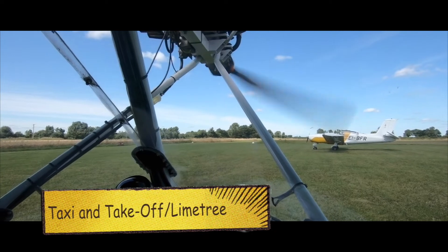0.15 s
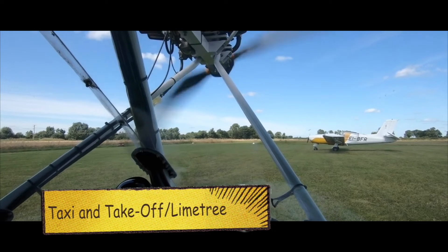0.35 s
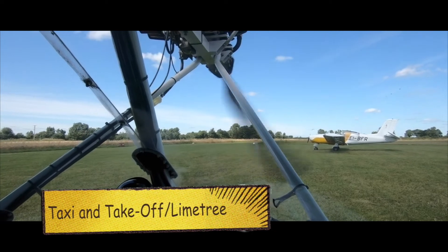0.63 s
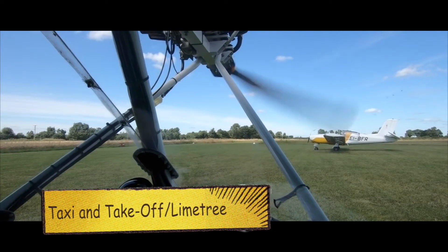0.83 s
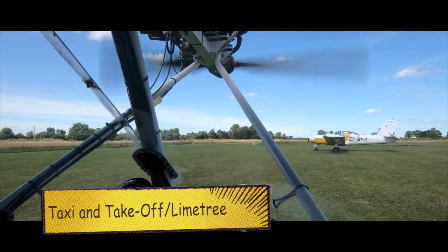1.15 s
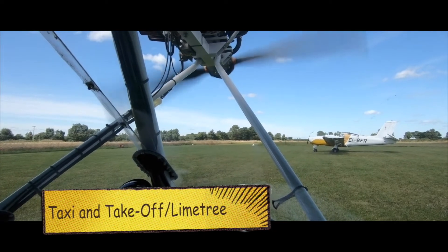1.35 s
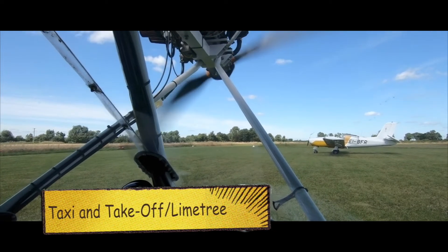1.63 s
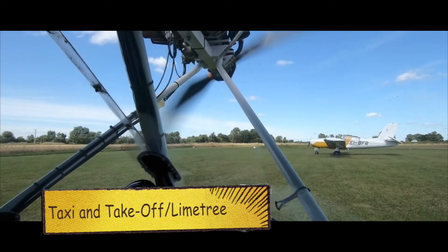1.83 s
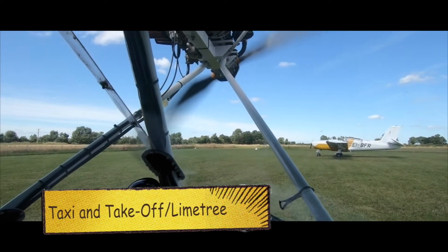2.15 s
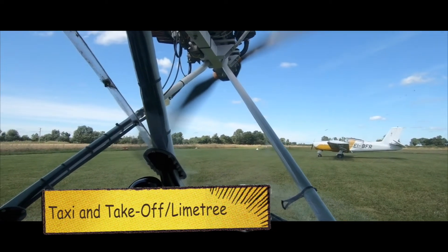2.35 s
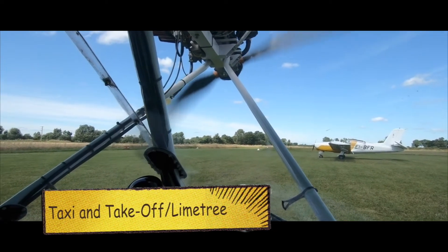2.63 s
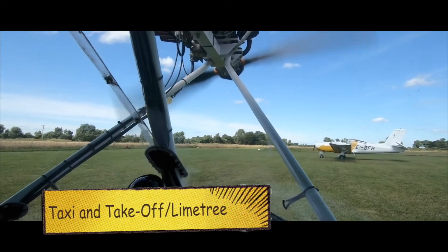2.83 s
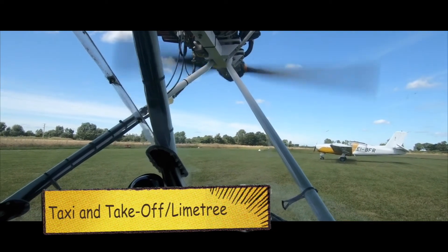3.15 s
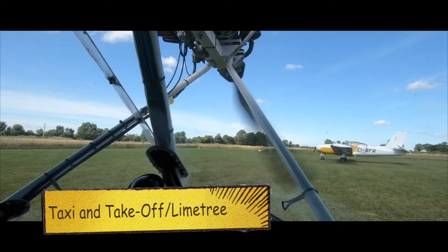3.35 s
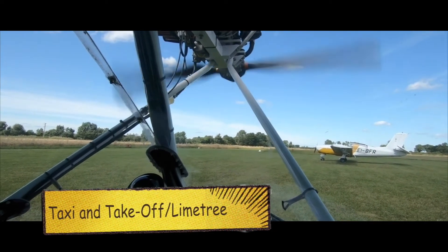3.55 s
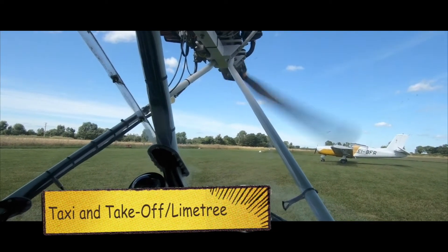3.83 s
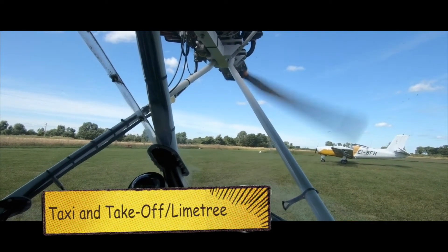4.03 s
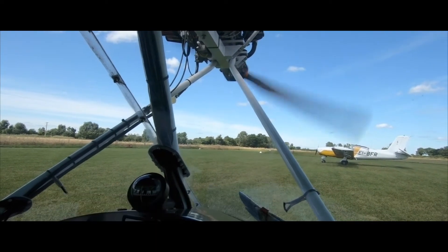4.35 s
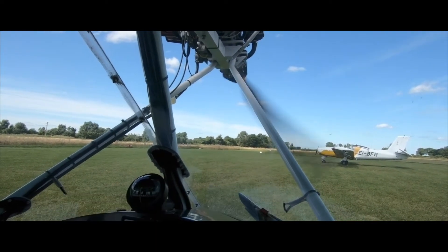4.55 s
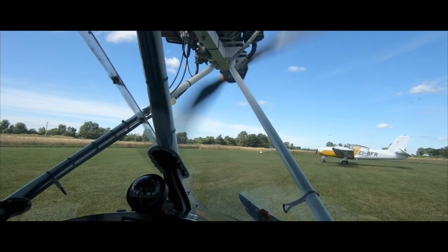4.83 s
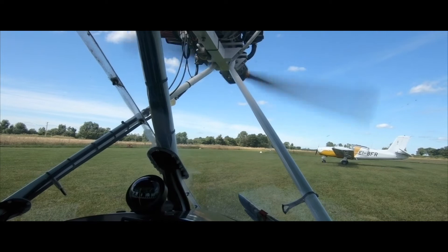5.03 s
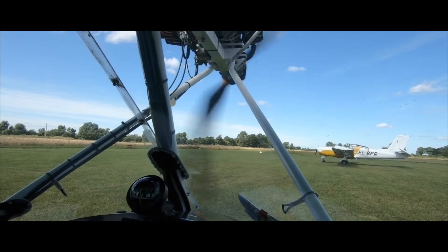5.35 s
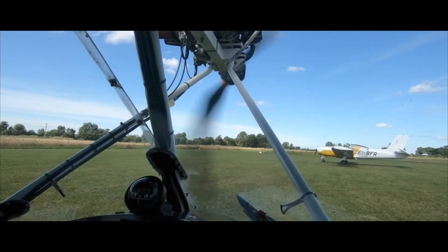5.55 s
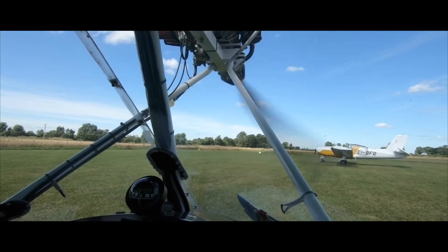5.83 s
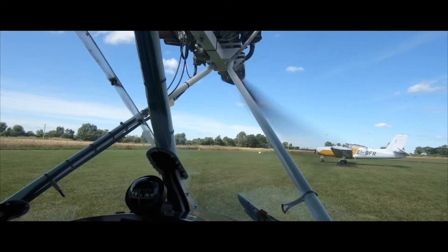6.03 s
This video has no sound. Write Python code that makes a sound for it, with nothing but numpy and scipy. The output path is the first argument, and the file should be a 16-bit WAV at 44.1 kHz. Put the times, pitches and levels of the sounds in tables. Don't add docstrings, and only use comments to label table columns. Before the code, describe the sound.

Close, rough two-cylinder engine drone with metallic rattle sags to a loud, harsh labour around four seconds, then climbs to a smoother buzzing hum.

```python
import sys
import numpy as np
from scipy import signal
from scipy.fft import rfft, irfft, next_fast_len
from scipy.io import wavfile
from scipy.ndimage import map_coordinates

SR = 44100
rng = np.random.default_rng(int(sys.argv[2]) if len(sys.argv) > 2 else 0)


def makeup_ratio(level_db):
    decades = np.asarray(level_db, float) / 20
    return 10 ** decades


def to_wav(s):
    ch = np.atleast_2d(s).T
    pcm = np.round(np.clip(ch, -1, 1) * 32767)
    wavfile.write(sys.argv[1], SR, pcm.astype(np.int16))


N = 273420


def unit(x):
    return x / np.sqrt(np.mean(x ** 2) + 1e-20)


def noise():
    return rng.standard_normal(N)


def along(points, hz):
    point_hz, point_db = np.transpose(points)
    return makeup_ratio(np.interp(np.log(hz + 1), np.log(point_hz + 1), point_db))


def bells(x, rows):
    return sum(height * np.exp(-((x - center) / width) ** 2) for center, width, height in rows)


def curves(rows):
    seconds, *columns = np.transpose(rows)
    return [np.interp(np.arange(N) / SR, seconds, column) for column in columns]


def wobble(rate):
    knots = rng.standard_normal(int(N * rate / SR) + 4)
    return map_coordinates(knots, [np.arange(N) * rate / SR])


def filtered(x, gain):
    m = 2 * next_fast_len(N // 2 + 8192)
    cepstrum = irfft(np.log(gain(np.fft.rfftfreq(m, 1 / SR)) + 1e-6), m)
    cepstrum[1:m // 2] *= 2
    cepstrum[m // 2 + 1:] = 0
    return unit(irfft(rfft(x, m) * np.exp(rfft(cepstrum)), m)[:N])


def firings(cycles):
    return np.flatnonzero(np.diff(np.floor(cycles)))


def per_firing(cycles, spread_db):
    return makeup_ratio(spread_db * rng.standard_normal(int(cycles[-1]) + 2))[cycles.astype(int)]


def puff(cycles, sharp):
    return np.exp(sharp * np.cos(2 * np.pi * (cycles - 0.1)))


STEPS = (0, .5, 1)


def by(setting, values):
    return np.interp(setting, STEPS, values)


MULTIPLES = (1, 2, 3, 4, 5, .5, 1.5, 3.5, 7, 8)
ORDER_STEPS = (0, .3, .55, 1)
ORDER_DB = [(-18.5, -17, -17, -19), (-39, -26, -18, -15), (-43, -27.5, -30, -31.5), (-56, -44, -31, -26.5),
            (-56, -54.5, -38.5, -33), (-29, -30, -36, -46), (-23.5, -37, -46, -44.5),
            (-54, -41, -46, -30.5), (-58, -58, -56, -45), (-56, -57, -55.5, -40.5)]
# center in Hz, width in Hz, lift in dB.
CHAMBERS = [(67.5, 1.6, -2), (120.4, 6, -5.5), (182, 4.2, 6.5), (204.2, 6.4, 13.5), (221.4, 12, 12),
            (265.3, 16, 8.5), (302.5, 10, 3.5), (323, 6.5, 16.5), (467, 30, 14)]
CHAMBER_SHARE = (.05, .3, 0.85)


def order_levels(rate, load):
    share = by(load, CHAMBER_SHARE)
    levels = []
    for multiple, row in zip(MULTIPLES, ORDER_DB):
        levels.append(np.interp(load, ORDER_STEPS, row) + share * bells(multiple * rate, CHAMBERS))
    return levels


def firing_orders(cycles, rate, levels):
    pipe_hz, pipe_width_hz = 144, 15
    tones = np.zeros(N)
    for multiple, db in zip(MULTIPLES, levels):
        hz = multiple * rate
        turn = sum(2 * np.arctan(2 * (hz - wave * pipe_hz) / pipe_width_hz) for wave in (1, 2))
        unsteady = 0.088 * multiple * wobble(8.3)
        level = np.sqrt(2) * makeup_ratio(db + 0.4 * multiple * wobble(14))
        tones += level * np.cos(2 * np.pi * multiple * cycles - turn + unsteady)
    return tones


# frequency in Hz, level in dB per Hz.
LOADED = [(8, -36.5), (25, -21), (50, -1.5), (100, 7.5), (130, 13), (200, 9.5), (300, 7.5), (380, -3.5),
          (600, -13.5), (1200, -60), (4000, -120)]
# frequency in Hz, level in dB per Hz.
LIGHT = [(8, -31), (25, -28), (45, -10), (63, 17.5), (80, 5), (125, 5), (170, 3.5), (290, -2.5), (380, -36),
         (600, -16), (1200, -64), (4000, -120)]
LIGHT_SHARE = (1, 0.05, 0.3)


def uneven_burns(cycles, load, thump_db):
    light = np.clip(by(load, LIGHT_SHARE), 0, 1)
    fired = firings(cycles)
    excess = rng.uniform(-0.024, 1, len(fired) + 1)
    kicks = np.zeros(N)
    kicks[fired] = excess[1:] - 0.9 * excess[:-1]
    kicks = unit(kicks)
    turbulence = puff(cycles, 1.37) * noise()
    loaded = filtered(kicks + 0.52 * turbulence, lambda hz: along(LOADED, hz))
    favored = 1 - 0.49 * np.cos(np.pi * (cycles + 0.18))
    easy = filtered(favored * (kicks + 0.4 * turbulence), lambda hz: along(LIGHT, hz))
    return makeup_ratio(thump_db) * (np.sqrt(1 - light) * loaded + np.sqrt(light) * easy)


# multiple of the blade passing rate, level in dB.
BLADE_ORDERS = [(2, 3), (4, 1.5)]
BLADE_DB = (-31, -38, -45)
CHOP_DB = (3, 1.1, .5)


def propeller(cycles, load):
    firings_per_turn = 6
    blade_at = 5.34
    turns = (cycles - cycles[round(blade_at * SR)]) / firings_per_turn
    tones = np.zeros(N)
    for multiple, db in BLADE_ORDERS:
        phase = 4 * np.pi * multiple * turns + 1.3 * wobble(11)
        tones += makeup_ratio(db + 2.5 * wobble(7)) * np.cos(phase)
    chop = 0.63 * np.cos(4 * np.pi * turns) + 0.13 * np.cos(2 * np.pi * (turns - 0.1))
    return makeup_ratio(by(load, BLADE_DB)) * tones, makeup_ratio(by(load, CHOP_DB) * chop)


# frequency in Hz, level in dB per Hz.
METAL = [(530, -26.5), (900, -2), (1060, 1), (1500, -11), (1950, -10.5), (2120, -22), (2390, -15),
         (2590, -16.5), (3490, -18.5), (6720, -26), (7660, -32), (8430, -29), (11300, -51.5),
         (12900, -35.5), (15500, -55.5)]
# frequency in Hz, width in Hz, dB over the metal's color.
PANELS = [(1045, 83, -13), (1400, 21, -18), (1583, 25, -0.5), (1791, 65, -3.5), (1993, 25, 1.5),
          (2150, 74, -11.5), (2174, 110, 0.5), (2520, 29, -9), (2545, 33, -8.5), (2650, 36, -2.5),
          (2908, 75, -6.5), (3216, 30, -2.5), (4480, 74, -16.5), (5300, 26, -9.5), (5900, 87, -8),
          (6540, 140, -1.5), (7150, 210, -8), (8040, 71, -9)]


def panels(hz, lift_db):
    bumps = sum(makeup_ratio(db) / (1 + (2 * (hz - center) / width) ** 2) for center, width, db in PANELS)
    return along(METAL, hz) * (1 + makeup_ratio(lift_db) * bumps)


# frequency in Hz, level in dB per Hz.
GAS = [(180, -25.5), (300, -2.5), (410, -8), (640, -12), (900, -20), (1100, -23), (1300, -30), (1520, -30),
       (1750, -30.5), (2000, -35.5), (2250, -39), (2700, -50), (5000, -120)]
ROAR_DB = (-33, -27.5, -22.5)
CLATTER_DB = (-61.5, -45.5, -39.5)


def roar_and_clatter(cycles, chop, throttle):
    strength = per_firing(cycles, spread_db=1.38)
    gas = chop * strength * puff(cycles, 0.03) * noise()
    metal = strength * per_firing(cycles, spread_db=2.1) * puff(cycles, 0.21) * noise()
    roar = makeup_ratio(by(throttle, ROAR_DB)) * filtered(gas, lambda hz: along(GAS, hz))
    clatter = makeup_ratio(by(throttle, CLATTER_DB)) * filtered(metal, lambda hz: panels(hz, lift_db=10.5))
    return roar + clatter


# frequency in Hz, level in dB per Hz.
FINS = [(1000, -28.5), (2200, -7), (3000, -0.5), (4200, 3), (5500, 2.5), (6800, -1.5), (7600, -8.5),
        (8300, -9), (11300, -24.5), (13200, -10), (15600, -21)]
HISS_DB = (-63, -60, -48)
# frequency in Hz, level in dB per Hz.
WASH = [(3, -7), (10, -4), (25, -0.5), (45, -7.5), (120, -67)]


def slipstream(chop, throttle, rate):
    air = chop ** 0.3 * makeup_ratio(0.89 * wobble(13) + 0.81 * wobble(70)) * noise()
    wash = makeup_ratio(3.5 * wobble(6.6)) * noise()
    hiss_db = by(throttle, HISS_DB) + 1.04 * np.maximum(rate - 87.4, 0)
    hiss = makeup_ratio(hiss_db) * filtered(air, lambda hz: along(FINS, hz))
    return hiss + makeup_ratio(-47) * filtered(wash, lambda hz: along(WASH, hz))


# start in seconds, peak in dB, time to fall 60 dB in seconds.
HARD = [(0.4685, -35, 0.08), (0.7928, -43, 0.041), (.8957, -31, 0.055), (0.9552, -35, 0.099),
        (1.007, -34.5, 0.065), (1.1133, -28.5, 0.075), (1.1674, -32.5, 0.039), (1.243, -36, 0.057),
        (1.283, -34, 0.082), (1.348, -33, 0.078), (1.459, -38.5, .08), (1.51, -38, 0.09),
        (1.6154, -35.5, 0.058), (1.651, -30.5, 0.082), (1.7212, -33, 0.058), (1.8534, -27, .054),
        (1.914, -31, 0.091), (1.9872, -37, .07), (2.1182, -33, .07), (2.2775, -33.5, .058),
        (2.331, -31, .053), (2.384, -36.5, .07), (2.517, -36, .076), (2.5733, -36, 0.1),
        (2.665, -26.5, .04), (2.705, -35, .1), (2.921, -36, 0.049), (3.1132, -37.5, 0.081),
        (4.588, -37, .057), (4.855, -37, 0.047)]
FIRM_DB = (-61, -50, -39)


def hard_burns(cycles, throttle):
    firm_reach_db, firm_t60 = 11.5, 0.055
    fired = firings(cycles)[1:]
    firm_db = by(throttle[fired], FIRM_DB) + firm_reach_db * rng.uniform(size=len(fired)) ** 3
    firm = [(i / SR, db, firm_t60) for i, db in zip(fired, firm_db)]
    shake = np.zeros(N + SR)
    t = np.arange(SR // 5) / SR
    build = (1 - np.exp(-t / 0.003)) ** 2
    for s, db, t60 in [*HARD, *firm]:
        start = round((s - 0.002) * SR)
        shake[start:start + len(t)] += makeup_ratio(db + 2 - 60 * t / max(t60, 0.01)) * build
    drive = shake[:N] * noise()

    def body(hz):
        return panels(hz, lift_db=9.5) * makeup_ratio(bells(hz, [(2700, 1100, 3.5), (8300, 1500, 3.4)]))

    return np.sqrt(np.mean(drive ** 2)) * filtered(drive, body)


RASP_DB = (-79.5, -59, -37.5)
# center in Hz, width in Hz, lift in dB.
RASP_LIFT = [(1930, 150, 7.5), (2640, 250, 8), (3170, 200, 4), (8300, 900, 11.5)]


def rasp(cycles, throttle):
    drive = puff(cycles, 0.44) * noise()

    def hot_metal(hz):
        return panels(hz, lift_db=13) * makeup_ratio(bells(hz, RASP_LIFT))

    return makeup_ratio(by(throttle, RASP_DB)) * filtered(drive, hot_metal)


# time in seconds, firing rate in Hz.
SPEED = [(0, 80.49), (.45, 80.09), (1, 76.64), (1.6, 75.17), (2.4, 75.73), (2.65, 74.56), (3, 74.03),
         (3.15, 72.27), (3.3, 68.48), (3.7, 61.55), (3.85, 60.26), (4, 60.63), (4.25, 66.79), (4.6, 78.55),
         (4.9, 85.23), (5.35, 90.25), (6, 91), (6.2, 91.2)]
# time in seconds, propeller load from 0 to 1, throttle from 0 to 1, uneven thump in dB.
WORK = [(0, .2, 0.28, -24.5), (.3, 0.3, 0.25, -25.5), (.7, .36, 0.42, -22.5), (1.1, .5, 0.46, -22),
        (1.5, .48, .38, -22), (1.95, .55, 0.56, -23.5), (2.3, .55, 0.4, -24), (3.2, 0.5, 0.52, -25.5),
        (3.27, .9, 0.79, -29.5), (3.5, 0.8, 0.94, -26.5), (3.78, 1, 0.95, -20.5), (4.05, 0.95, 1, -19),
        (4.28, 1, 0.92, -27.5), (4.55, .6, 0.44, -24), (4.7, 0.13, 0.06, -23.5), (5, 0.04, 0, -25.5),
        (5.45, 0, 0.04, -24), (6.2, 0.04, 0.12, -23.5)]
# time in seconds, half length in seconds, loss of throttle from 0 to 1.
STUMBLES = [
    (3.346, 0.017, 0),
    (3.543, 0.033, 0.23),
    (3.906, 0.031, 0.2),
    (4.326, 0.017, .15),
]


def scene():
    rate, = curves(SPEED)
    load, throttle, thump_db = curves(WORK)
    missed = bells(np.arange(N) / SR, STUMBLES)
    load = load - 0.97 * missed
    throttle = throttle - missed
    cycles = np.cumsum(rate) / SR
    mix = firing_orders(cycles, rate, order_levels(rate, load))
    mix += uneven_burns(cycles, load, thump_db)
    blade_tones, chop = propeller(cycles, load)
    mix += blade_tones
    mix += roar_and_clatter(cycles, chop, throttle)
    mix += slipstream(chop, throttle, rate)
    mix += hard_burns(cycles, throttle)
    mix += rasp(cycles, throttle)
    return mix[None]


def top_cut(x):
    return signal.sosfilt(signal.butter(12, 15610, fs=SR, output="sos"), x)


# center in Hz, width in Hz, lift in dB.
HOUSING = [(395, 51, -4), (564.4, 16, -7.5), (627, 15, 2), (720, 10, 3), (757, 44, -1), (1187, 57, 3.5),
           (1278, 35, -5.5), (1320, 23, 5.5), (3730, 26, 0), (11400, 330, -6)]


def record(dry):
    edge = np.minimum(np.arange(N) + 160, np.arange(N, 0, -1))
    gate = np.clip(edge / (0.006 * SR), 0, 1)
    rounded = gate * dry / (1 + (dry / 0.78) ** 4) ** (1 / 4)
    heard = np.std(rounded) * filtered(rounded[0], lambda hz: makeup_ratio(bells(hz, HOUSING)))[None]
    return top_cut(gate * heard)


dry = scene()
out = record(dry)
to_wav(out)
```